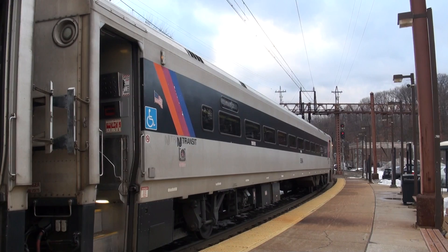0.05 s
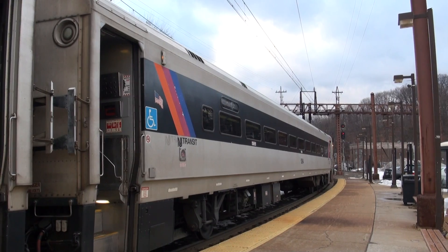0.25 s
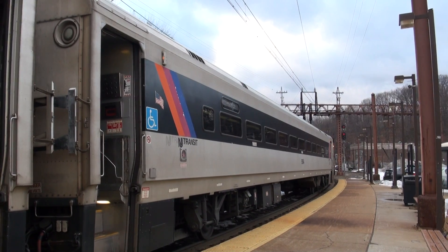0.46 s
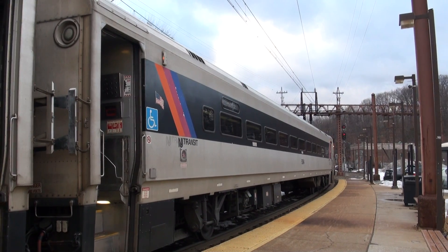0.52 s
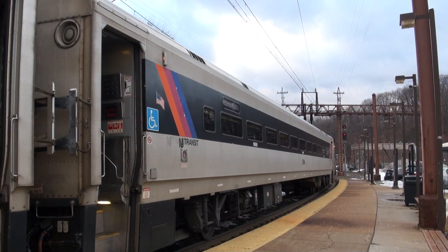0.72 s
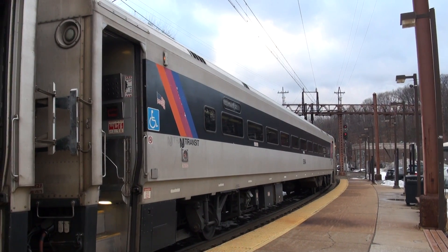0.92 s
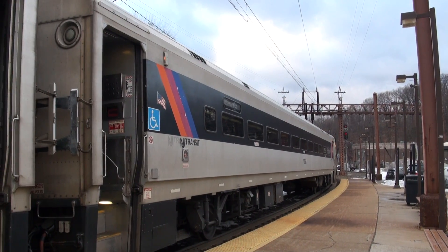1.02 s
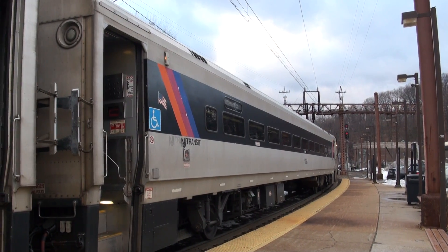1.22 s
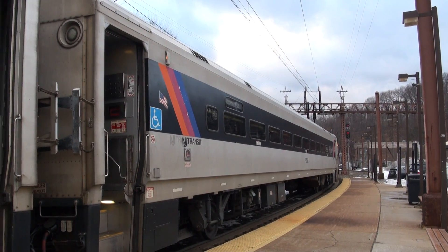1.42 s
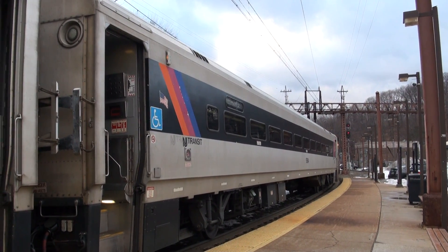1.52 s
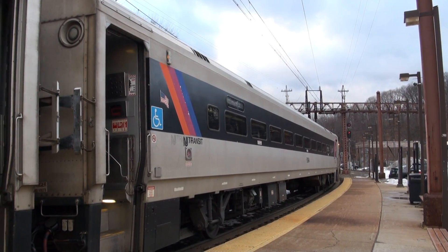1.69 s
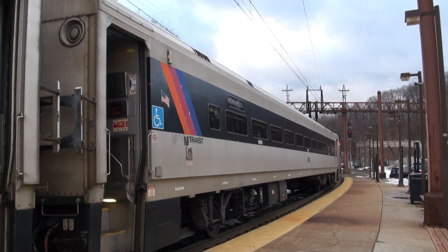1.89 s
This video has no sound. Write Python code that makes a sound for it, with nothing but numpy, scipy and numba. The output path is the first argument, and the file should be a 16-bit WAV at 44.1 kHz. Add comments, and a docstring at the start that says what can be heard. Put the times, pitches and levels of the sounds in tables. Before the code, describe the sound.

Air brakes hiss loudly from a standing train, heard from the outdoor platform beside it. A small valve tick starts the blast, which thins, stops and briefly echoes, while the train idles with a low rumble.

```python
"""A standing train releases its air brakes, heard from the open platform beside it. A valve ticks, air
blasts through ringing ports for half a second, then a thinner, higher hiss drains away with a faint
moan and is shut off. The car side and platform, close to the microphone, colour the jets and a far wall
echoes them. Underneath, the idling train rumbles and hums, ducked by the recorder's gain control."""
import sys
import numpy as np
from scipy import signal
from scipy.fft import rfft, irfft
from scipy.io import wavfile
from scipy.ndimage import uniform_filter1d
from numba import njit

SR = 44100
rng = np.random.default_rng(int(sys.argv[2]) if len(sys.argv) > 2 else 0)


def dump(signal):
    """Clip the signal to [-1, 1] and save it as 16-bit WAV at the path in sys.argv[1]."""
    limited = np.clip(np.atleast_2d(signal).T, -1, 1)
    pcm = np.round(limited * 32767).astype(np.int16)
    wavfile.write(sys.argv[1], SR, pcm)


N = 85995
TIME = np.arange(N) / SR


def undb(db):
    """Decibels to gain."""
    return 10 ** (np.asarray(db) / 20)


def unit(x):
    """Scale to rms 1."""
    return x / np.sqrt(np.mean(x ** 2))


def walk(rate_hz):
    """A smooth random wander with rms 1, taking rate_hz steps a second."""
    hold = max(int(SR / rate_hz), 1)
    steps = np.repeat(rng.standard_normal(N // hold + 1), hold)
    return unit(uniform_filter1d(uniform_filter1d(steps, hold), hold)[:N])


def colour(x, curve, peaks=()):
    """Filter by a (Hz, dB) curve with resonant peaks on top."""
    bin_hz = np.fft.rfftfreq(len(x), 1 / SR)
    curve_hz, curve_db = np.array(curve).T
    db = np.interp(np.log(bin_hz + 1), np.log(curve_hz), curve_db)
    for hz, width_hz, lift_db in peaks:
        db += lift_db / (1 + (2 * (bin_hz - hz) / width_hz) ** 2)
    return irfft(rfft(x) * undb(db), len(x))


def idling_train(rumble_db=-42, waver_db=1):
    """The train idles at the platform: a slowly wavering rumble with generator hum."""
    # Train rumble and recorder hiss. Each row: frequency in Hz, relative level in dB.
    rumble_spectrum = [(20, -1.5), (29, 8), (40, -2), (80, -0.5), (170, -1.5), (330, -.5), (480, -7),
                       (750, -4.5), (1100, -7.5), (1600, -14), (2200, -21), (3500, -30), (6000, -36),
                       (9700, -46), (10400, -39), (18000, -45.5)]
    # Generator harmonics. Each row: frequency in Hz, level in dB.
    harmonics = [(59.2, -56.5), (118.4, -63.5), (178, -59.5)]
    rumble = unit(colour(rng.standard_normal(N), rumble_spectrum))
    rumble *= undb(rumble_db + waver_db * walk(5.5))
    hum = np.zeros(N)
    for hz, db in harmonics:
        phase = 2 * np.pi * (hz * TIME + rng.random()) + 0.33 * walk(3.75)
        hum += np.sqrt(2) * undb(db) * np.sin(phase)
    return rumble + hum


def valve_tick(start_s=.1678, decay_s=.0033, level_db=-42):
    """The valve unseats with a small dry click."""
    # The click's spectrum. Each row: frequency in Hz, relative level in dB.
    spectrum = [(1000, 2), (3100, 3), (5200, -12), (7300, -11.5), (9500, -15), (13000, -28), (18000, -28)]
    age = TIME - start_s
    envelope = (age >= 0) * np.exp(-np.abs(age) / decay_s)
    return unit(colour(rng.standard_normal(N), spectrum)) * envelope * undb(level_db)


def turbulence(bands=8, flicker_db=.8, flicker_hz=60, flutter_db=.45, flutter_hz=55):
    """Turbulent air: noise whose bands flicker on their own and flutter together."""
    bins = rfft(rng.standard_normal(N))
    band_of_bin = np.arange(len(bins)) * bands // len(bins)
    eddies = np.zeros(N)
    for band in range(bands):
        eddies += irfft(bins * (band_of_bin == band), N) * undb(flicker_db * walk(flicker_hz))
    return eddies * undb(flutter_db * walk(flutter_hz))


def airflow(opens_s, closes_s, attack_s, release_s, sag_db_per_s=0, swell_db=3.5, swell_s=.077):
    """A jet's envelope: the valve opens, flow builds, sags if the pressure falls, and is shut off."""
    age = np.maximum(TIME - opens_s, 0)
    opening = np.minimum(age / attack_s, 1)
    closing = np.exp(-np.maximum(TIME - closes_s, 0) / release_s)
    flow_db = -swell_db * np.exp(-age / swell_s) - sag_db_per_s * age
    return opening * closing * undb(flow_db)


def air_blast(level_db=-20):
    """Brake air rushes out through a ringing exhaust port at steady pressure."""
    # The jet's spectrum. Each row: frequency in Hz, relative level in dB.
    spectrum = [(300, -22.5), (800, -9), (1400, -9), (2200, -2.5), (2700, -8.5), (3200, -4), (4600, -.5),
                (6200, -1.5), (7300, 3), (8700, -3), (10000, -2), (10400, 4.5), (11500, 2.5), (13500, -1.5),
                (16000, -3.5), (18000, -7.5)]
    # Narrow port resonances. Each row: centre in Hz, width in Hz, lift in dB.
    resonances = [(5135, 55, 8), (5912, 75, 9), (6645, 45, 10), (7080, 50, 4), (7530, 80, 6), (9490, 50, 5),
                  (10380, 140, 4), (11050, 120, 3)]
    jet = unit(colour(turbulence(), spectrum, resonances))
    flow = airflow(opens_s=.1945, closes_s=.687, attack_s=.019, release_s=.042)
    return jet * flow * undb(level_db)


def draining_hiss(level_db=-23.5):
    """The remaining air drains in a thinner, higher jet that fades as the pressure falls."""
    # The jet's spectrum. Each row: frequency in Hz, relative level in dB.
    spectrum = [(300, -6.5), (500, -5), (900, -5), (1500, -8.5), (2200, -4.5), (2700, -8), (3000, -1),
                (4500, -4.5), (7200, 1), (9000, -3), (9950, -5.5), (10400, 5), (12300, 6.5), (13100, -1.5),
                (15500, -3.5), (16800, 0), (18000, -3.5)]
    # Broad port resonances. Each row: centre in Hz, width in Hz, lift in dB.
    resonances = [(2960, 330, 5), (6980, 210, 3.9), (8030, 170, 4.3), (11560, 240, 4.5), (12600, 240, 6.6),
                  (16800, 300, 3)]
    jet = unit(colour(turbulence(), spectrum, resonances))
    flow = airflow(opens_s=.69, closes_s=1.16, attack_s=.031, release_s=.011, sag_db_per_s=18.4)
    return jet * flow * undb(level_db)


def moan(start_s=.72, length_s=.23, start_hz=488, rise=.04, level_db=-53):
    """A faint, slightly rising tone as the pressure lets go."""
    progress = np.clip((TIME - start_s) / length_s, 0, 1)
    hz = start_hz * (1 + rise * progress + 0.0063 * walk(50))
    tone = np.sin(2 * np.pi * np.cumsum(hz) / SR)
    arch = np.sqrt(8 * progress * (1 - progress))
    return tone * arch * undb(level_db + 2 * walk(32))


def station(direct, bounces=24):
    """Car side and platform comb the sound at the microphone; a dull tail and a far wall's echo follow."""
    # The tone of the distant reflections. Each row: frequency in Hz, gain in dB.
    distant_tone = [(300, -2.5), (2500, -2), (4000, 3), (6500, -0.5), (9000, -2), (12000, -9.5),
                    (14500, -10), (18000, -17)]
    near_db, near_spread_s = -7, .014
    tail_db, tail_t60_s = -12, 1
    echo_db, echo_s, echo_smear_s = -13.5, .155, .012
    near = np.zeros(N)
    delays, strengths = rng.random((bounces, 2)).T
    near[(SR * near_spread_s * delays).astype(int) + 1] = strengths - .5
    tail = rng.standard_normal(N) * np.exp(-np.log(1000) * TIME / tail_t60_s)
    echo = rng.standard_normal(N) * (TIME > echo_s) * np.exp(-np.abs(TIME - echo_s) / echo_smear_s)
    far = undb(tail_db) * unit(tail) + undb(echo_db) * unit(echo)
    from_near = signal.fftconvolve(direct, unit(near) / np.sqrt(N))[:N]
    from_far = signal.fftconvolve(direct, far / np.sqrt(N))[:N]
    return direct + undb(near_db) * from_near + colour(from_far, distant_tone)


def scene():
    """One microphone on the platform: the brake release and its reflections over the idling train."""
    brakes = air_blast() + draining_hiss() + valve_tick()
    return (station(brakes) + moan() + idling_train())[None]


@njit
def follow(x, attack, release):
    """Envelope follower with separate rise and fall rates per sample."""
    envelope, level = np.empty(len(x)), 0.
    for i in range(len(x)):
        level += (x[i] - level) * (attack if x[i] > level else release)
        envelope[i] = level
    return envelope


def record(dry):
    """The recorder's gain control ducks everything under the blast and recovers slowly; the top is cut."""
    threshold_db, ratio, attack_s, release_s = -31.5, 1.41, .011, .39
    cutoff_hz = 18120
    loudness = follow(np.abs(dry[0]), 1 / (SR * attack_s), 1 / (SR * release_s))
    gain = np.maximum(loudness / undb(threshold_db), 1) ** (1 / ratio - 1)
    lowpass = signal.ellip(10, .2, 70, cutoff_hz, fs=SR, output="sos")
    return signal.sosfilt(lowpass, dry * gain)


dry = scene()
out = record(dry)
dump(out)
```